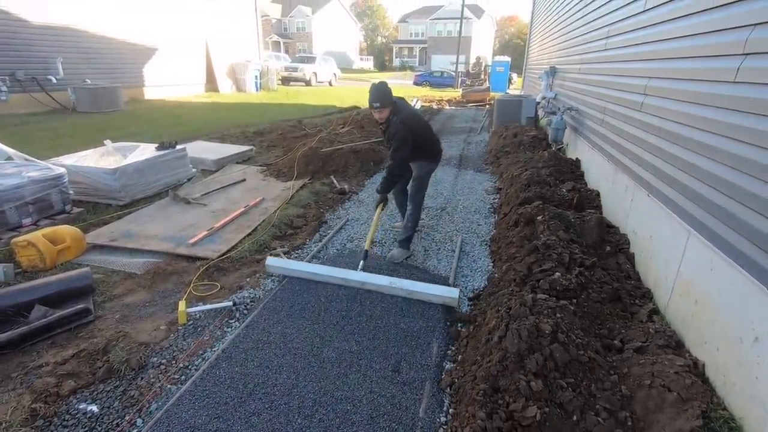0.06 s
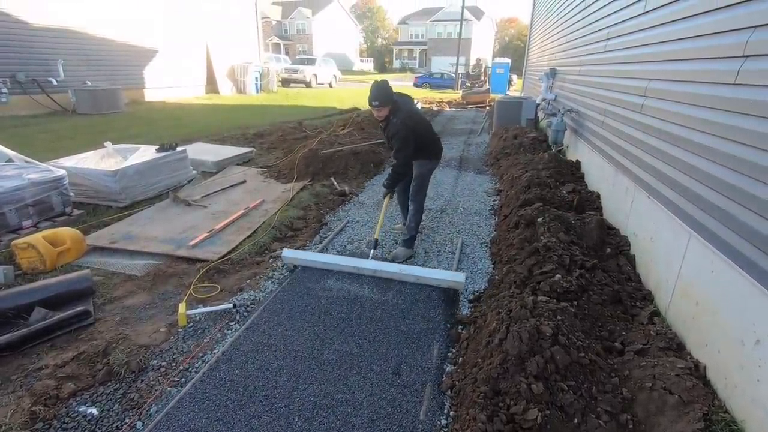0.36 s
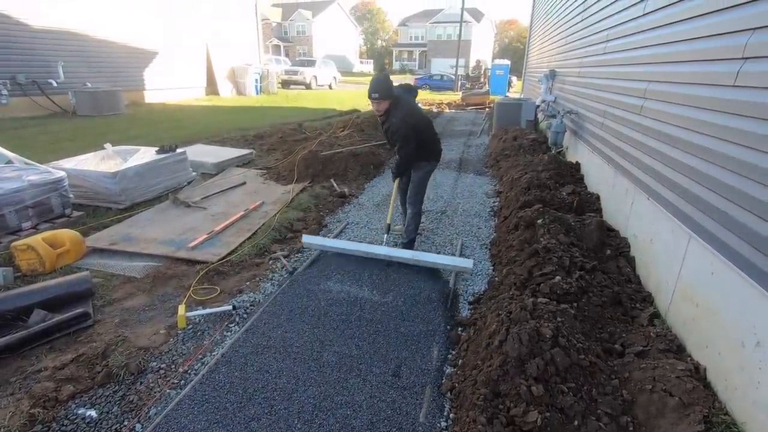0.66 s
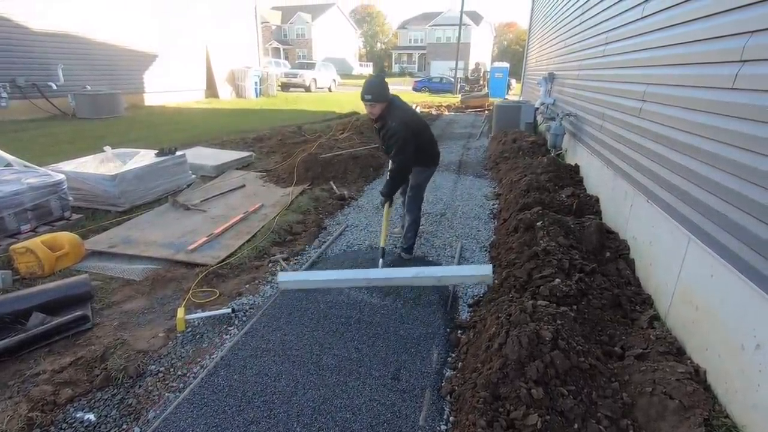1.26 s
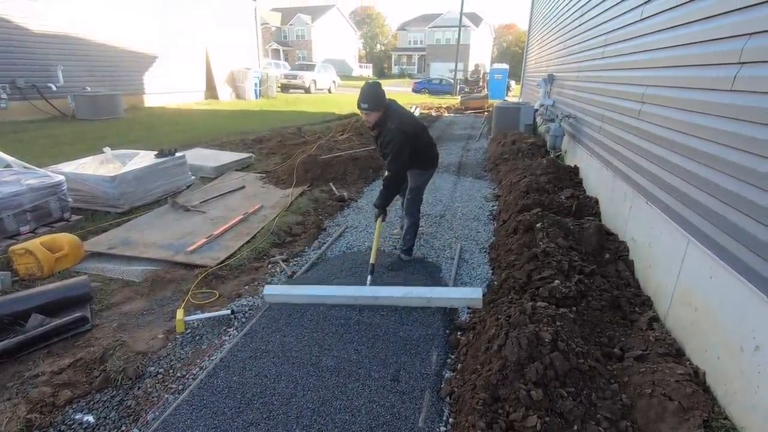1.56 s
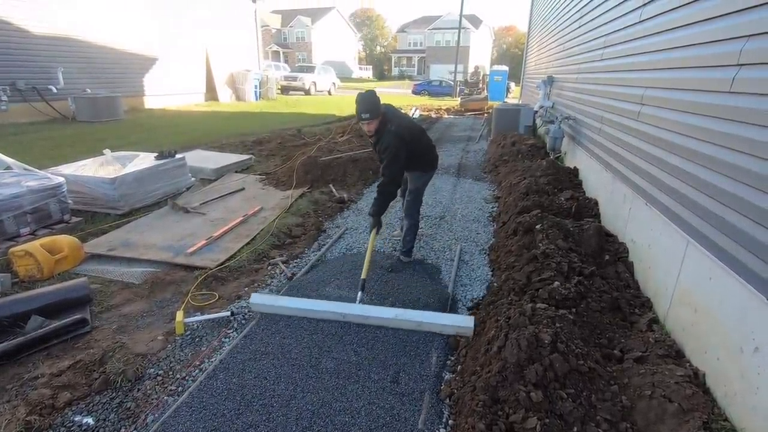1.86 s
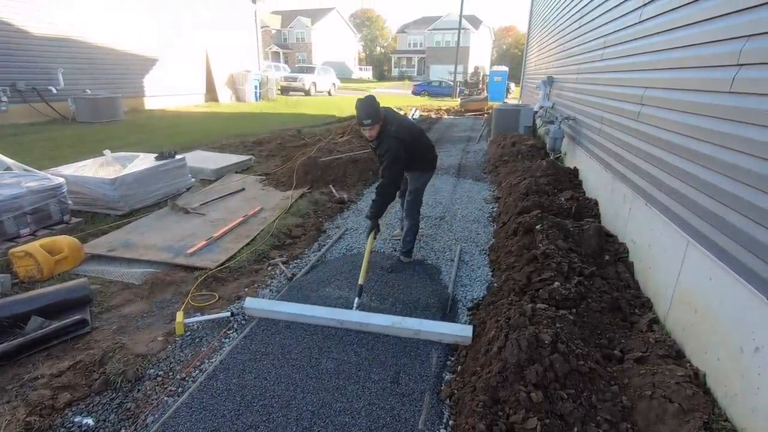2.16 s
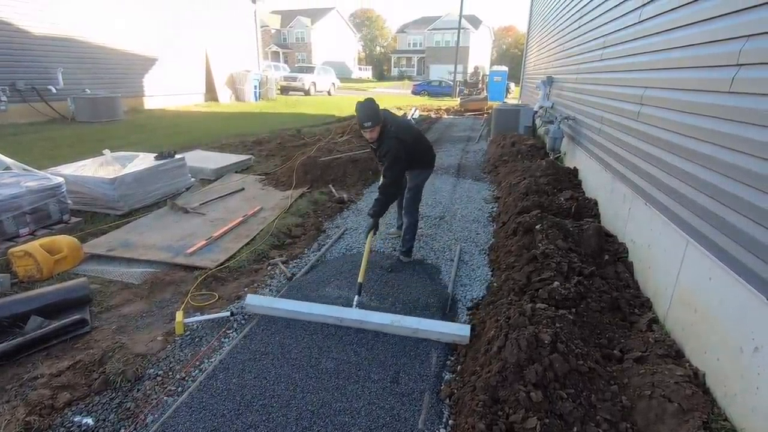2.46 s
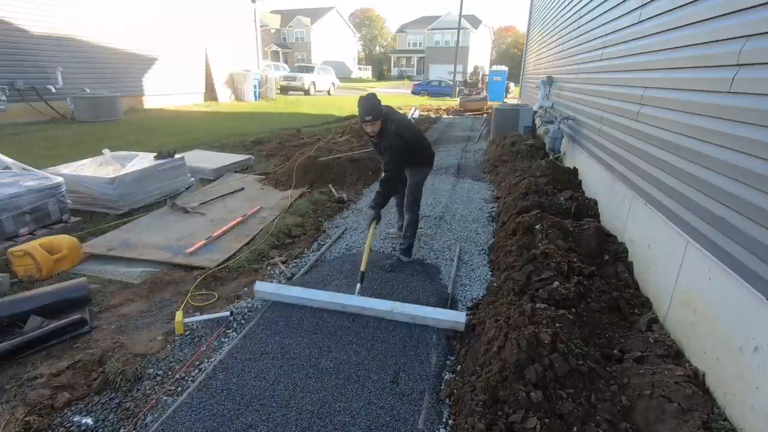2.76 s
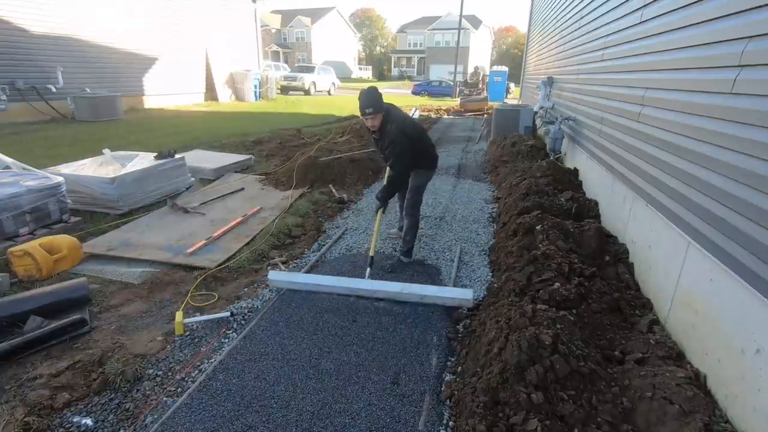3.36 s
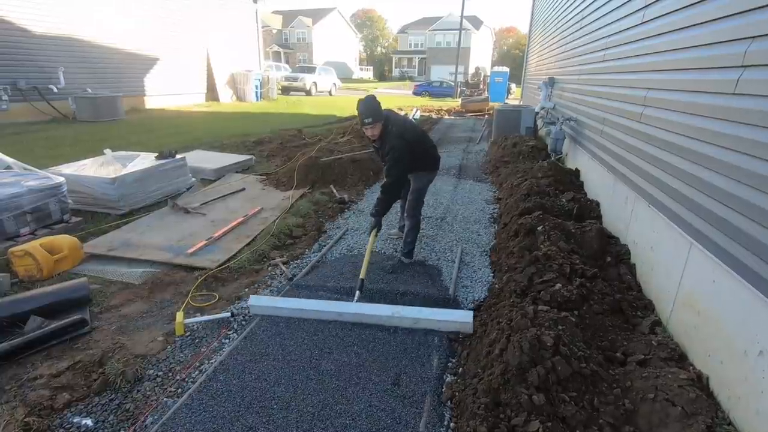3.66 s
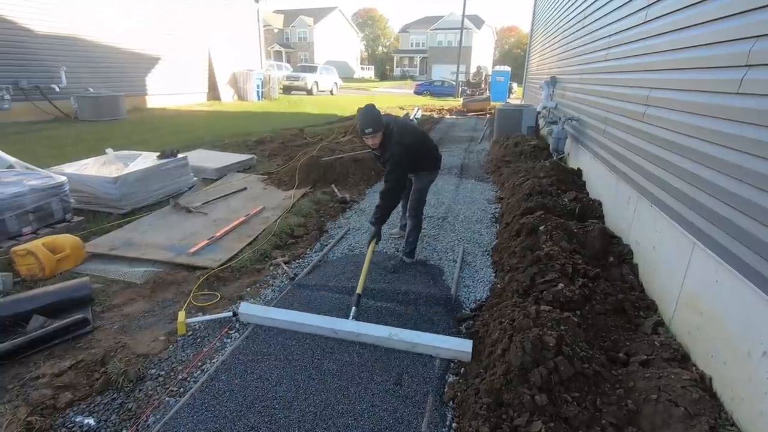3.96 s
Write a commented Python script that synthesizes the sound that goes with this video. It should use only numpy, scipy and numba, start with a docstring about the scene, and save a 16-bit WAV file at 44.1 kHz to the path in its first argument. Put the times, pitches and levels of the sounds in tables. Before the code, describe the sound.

A long metal blade grinds through gravel, spilling fine stones, then pauses and knocks down with a ring. A second rough pull follows, ending in sharp clangs, over a faint outdoor hum and low wind on the microphone.

```python
"""Gravel crunches under a long hollow metal screed: pulled, lifted, set down, nudged and pulled again.
Fine stones spill ahead of the blade; it judders as it catches, and the heap groans in the second pull.
The metal clangs when it is set down and rings lightly when loose stones tick against it.
House walls echo the work; wind buffets the microphone over a faint outdoor hum."""
import sys
import numpy as np
from scipy import signal
from scipy.fft import rfft, irfft
from scipy.io import wavfile
from numba import njit

SR = 44100
rng = np.random.default_rng(int(sys.argv[2]) if len(sys.argv) > 2 else 0)


def dump(signal):
    """Clip the signal to [-1, 1] and save it as 16-bit WAV at the path in sys.argv[1]."""
    limited = np.clip(np.atleast_2d(signal).T, -1, 1)
    pcm = np.round(limited * 32767).astype(np.int16)
    wavfile.write(sys.argv[1], SR, pcm)


N = 176400
COARSE_PER_S, FINES_PER_S = 2200, 7000  # stone contacts
NEAR_WALL_S, NEAR_WALL_DB = .003, -15.5


def undb(db):
    """Decibels to gain."""
    return 10 ** (np.asarray(db) / 20)


def clock(size=N):
    """Time of every sample."""
    return np.arange(size) / SR


def unit(x):
    """Scale to rms 1."""
    return x / np.sqrt(np.mean(x ** 2))


def fader(rows):
    """Gain from (time [s], level [dB]) rows, silent outside them."""
    return undb(np.interp(clock(), *np.array(rows).T, left=-120, right=-120))


def gains(spectrum, hz):
    """Gain of a spectrum at the given frequencies."""
    f, db = np.array(spectrum).T
    return undb(np.interp(np.log(hz + 1e-6), np.log(f), db))


def response(spectrum, size=2048):
    """Minimum-phase impulse response of a spectrum, with unit energy."""
    cepstrum = irfft(np.log(gains(spectrum, np.fft.rfftfreq(size, 1 / SR))))
    cepstrum[1:size // 2] *= 2
    cepstrum[size // 2 + 1:] = 0
    return unit(irfft(np.exp(rfft(cepstrum)))) / np.sqrt(size)


def through(x, impulse):
    """Pass a sound through an impulse response."""
    return signal.oaconvolve(x, impulse)[:N]


def delay(x, s):
    """Start a sound s seconds late."""
    return np.pad(x, (max(int(s * SR), 0), N))[:N]


def noise(spectrum):
    """Steady coloured noise, rms 1."""
    return unit(irfft(rfft(rng.standard_normal(N)) * gains(spectrum, np.fft.rfftfreq(N, 1 / SR)), N))


def stones(per_s, spread_db, size=N):
    """Random stone contacts, many small and a few large; rms 1."""
    when, big, sign = rng.random((3, size))
    strength = undb(spread_db * np.minimum(-np.log(1 - big), 4))
    return unit((when < per_s / SR) * strength * np.sign(sign - .5) + 1e-12)


def burst(shape, per_s):
    """A cluster of stone contacts that carries the energy of its envelope."""
    return unit(shape * stones(per_s, spread_db=3.0, size=len(shape))) * np.sqrt(np.mean(shape ** 2))


def ring(modes, size=SR // 2):
    """Decaying modes of alternating sign from (pitch [Hz], level [dB], t60 [s]) rows."""
    t = clock(size)
    return sum((-1) ** k * undb(db) * np.sin(2 * np.pi * hz * t) * np.exp(-np.log(1000) * t / t60)
               for k, (hz, db, t60) in enumerate(modes))


# dark outdoor bed (frequency [Hz], relative level [dB])
HUM_EQ = [(30, -23), (70, 9), (130, -3), (330, -1.5), (700, -8), (1100, -15.5), (1800, -23), (4000, -29.5),
          (10000, -34)]
def hum(level_db=-51):
    """A faint, steady wash of low outdoor noise."""
    return undb(level_db) * noise(HUM_EQ)


# deep sway and low flutter (frequency [Hz], relative level [dB])
SWAY_EQ = [(1, -28.5), (5, 3.5), (9, -4.5), (16, -18.5), (30, -27), (45, -39.5), (65, -59), (120, -53.5),
           (400, -95)]
BUFFET_EQ = [(10, -45), (25, 4), (45, 15), (70, -33), (120, -22), (400, -53)]
# swell of the gusts (time [s], level [dB])
GUSTS = [(0, -18), (.13, -26.5), (.22, -11.5), (.4, -19.5), (.75, -12), (1.0, -22.5), (1.15, -10.5),
         (1.35, -16), (1.6, -22.5), (2.05, -18.5), (2.18, -9.5), (2.28, -15), (2.65, -19), (3.3, -27.5),
         (3.68, -24), (4, -21.5)]
def wind(buffet_db=-7.5, buffet_power=2.19):
    """Wind sways on the microphone; the strongest gusts break into a flutter."""
    gust = fader(GUSTS)
    return noise(SWAY_EQ) * gust + undb(buffet_db) * noise(BUFFET_EQ) * gust ** buffet_power


def yard_echo(x, level_db=-17.5, t60_s=.18):
    """The houses around throw back a short diffuse tail."""
    wash = noise([(100, 4.5), (2000, 1), (5000, -19.5), (15000, -9)])[:SR]
    tail = wash * np.exp(-np.log(1000) * clock(SR) / t60_s)
    return undb(level_db) * through(delay(x, NEAR_WALL_S), unit(tail) / np.sqrt(SR))


# metallic shimmer (frequency [Hz], relative level [dB])
SHIMMER_EQ = [(2000, -6.5), (3000, -2), (4400, -2.5), (5400, -18.5), (6500, -20.5), (8000, -13),
              (10000, -21), (13000, -30)]
def overtones(count=110, spacing_power=1.6, t60_s=.22):
    """The irregular high modes of the hollow blade, sparser toward the top; one ring per row."""
    place = (np.arange(count) + rng.uniform(0, 1.97, count)) / (count + 1)
    low_hz, high_hz = SHIMMER_EQ[0][0], SHIMMER_EQ[-1][0]
    pitches = low_hz + (high_hz - low_hz) * place ** spacing_power
    levels = 20 * np.log10(gains(SHIMMER_EQ, pitches))
    return np.array([ring([(hz, db, t60_s)]) for hz, db in zip(pitches, levels)])


def at_spot(modes, scatter_db=7):
    """One point of contact gives each ringing mode its own strength and sign."""
    strength, sign = rng.uniform(-1, 1, (2, len(modes)))
    return (np.sign(sign) * undb(scatter_db * strength)) @ modes


def tinkle(per_s=700, low_hz=4500, high_hz=10500, t60_s=.04):
    """Stones click against each other, each with its own brief high pitch; rms 1."""
    out = np.zeros(N + SR)
    for when, pitch, strength in rng.random((int(per_s * N / SR), 3)):
        grain = strength * ring([(low_hz + pitch * (high_hz - low_hz), 0, t60_s)], size=2048)
        start = int(when * N)
        out[start:start + len(grain)] += grain
    return unit(out[:N])


def ping(at_s=.631, hz=9400, level_db=-32, t60_s=.14):
    """One loose stone gives a thin high ping."""
    return delay(ring([(hz, level_db, t60_s)]), at_s)


# light ring of the blade's walls (pitch [Hz], relative level [dB], t60 [s])
WALL_MODES = [(1620, -8, .15), (1880, 2, .1), (2645, 2, .1), (2930, -4, .1), (3250, 2, .13), (3450, -2, .1),
              (3900, 4, .1), (4360, -5, .1)]
# stones skimming the blade (time [s], level [dB])
SKIM = [(0, -32), (.3, -50), (.6, -61), (.89, -43.5), (.94, -54), (1.0, -41), (1.07, -69), (1.73, -83),
        (1.77, -54), (1.97, -66), (2.12, -75), (2.19, -38.5), (2.28, -51), (2.45, -51.5), (2.52, -63),
        (2.59, -47.5), (2.74, -37.5), (3.32, -37.5), (3.44, -50.5), (3.58, -45), (3.73, -48), (4, -52)]
def ticks(shimmer, per_s=660, spot_s=.09, shimmer_db=-3.5, tinkle_db=-21.5):
    """Loose stones tinkle and ring the blade's walls; the colour shifts as the contact wanders."""
    taps, step = stones(per_s, spread_db=2.0), int(spot_s * SR)
    modes = np.array([ring([mode]) for mode in WALL_MODES])
    walls = np.zeros(N + SR)
    for i in range(0, N, step):
        spot = unit(unit(at_spot(modes)) + undb(shimmer_db) * unit(at_spot(shimmer)))
        rung = signal.fftconvolve(taps[i:i + step], spot)
        walls[i:i + len(rung)] += rung
    return (unit(walls[:N]) + undb(tinkle_db) * tinkle()) * fader(SKIM)


@njit
def resonate(x, hz, width_hz):
    """State-variable band-pass whose centre moves every sample."""
    out, band_state, low_state = np.empty(len(x)), 0., 0.
    for i in range(len(x)):
        tuning, damping = np.tan(np.pi * hz[i] / SR), width_hz / hz[i]
        band = (band_state + tuning * (x[i] - low_state)) / (1 + tuning * (tuning + damping))
        band_state = 2 * band - band_state
        low_state += 2 * tuning * band
        out[i] = damping * band
    return out


# groan of the pushed heap (time [s], upper pitch [Hz], lower pitch [Hz], level [dB])
GROAN_GLIDE = [(2.62, 620, 570, -62), (2.67, 670, 570, -36), (2.78, 750, 595, -40.5), (2.92, 734, 613, -28),
               (2.99, 774, 502, -36), (3.13, 883, 520, -37.5), (3.199, 870, 520, -40.5)]
def groan(width_hz=45., lower_db=-2):
    """Under load, stick and slip of the stones drives two gliding resonances."""
    s, upper_hz, lower_hz, db = np.array(GROAN_GLIDE).T
    slips = stones(COARSE_PER_S, spread_db=6.5)
    upper = unit(resonate(slips, np.interp(clock(), s, upper_hz), width_hz))
    lower = unit(resonate(slips, np.interp(clock(), s, lower_hz), width_hz))
    return unit(upper + undb(lower_db) * lower) * fader(list(zip(s, db)))


def focus_db(hz, centre_hz, db_per_octave=4.5):
    """A blow drives the pitches around its centre most strongly."""
    return -db_per_octave * np.abs(np.log2(hz / centre_hz))


# clang of the free blade (pitch [Hz], relative level [dB], t60 [s])
BLADE_MODES = [(318, -28.5, .5), (430, -31, .6), (630, -27, .42), (858, -28, .6), (955, -30, .36),
               (1001, -29, .36), (1152, -29, .32), (1400, -33, .26), (1525, -33, .34), (1597, -23, .25),
               (1656, -25.5, .27), (1787, -33, .45), (1828, -33, .45), (1895, -29, .27), (2634, -23.5, .15),
               (2925, -25, .19), (3254, -26, .25), (3369, -24, .18)]
# stony crack of a landing (frequency [Hz], relative level [dB])
CRACK_EQ = [(150, 11.5), (300, 10), (500, 2), (900, 10.5), (1700, 2), (3100, -10.5), (4300, 1.5),
            (5500, -34.5), (7500, -11.5), (10000, -28), (15000, -30)]
# landings and bumps (time [s], gain [dB], centre [Hz], crack trim [dB], brightness [dB])
KNOCKS = [(1.832, -11.5, 1850, 3, -19), (1.866, -11, 1420, -1.5, -32), (2.007, -24.5, 4120, 1, -13),
          (2.043, -17, 1230, -1, -37), (2.14, -22.5, 4290, 4, -28), (2.18, -30, 3820, 5.5, -22),
          (2.334, -24, 3950, 4.5, -30), (2.373, -26, 1780, 7, -28), (2.515, -31.5, 1060, -8, -35),
          (3.758, -0.5, 2260, 0.5, -34), (3.789, -6.5, 1650, 3, -13), (3.907, -6.5, 1130, 4, -7.5),
          (3.935, -12, 1490, 2.5, -26)]
def knocks(shimmer, crack_db=-23, crack_s=.017, sheen_db=-36, scatter_db=5.5):
    """The blade lands: a crack of stones, its free ring and overtones, each blow at another spot."""
    size = shimmer.shape[1]
    snap = undb(crack_db) * np.exp(-clock(size) / crack_s)
    bins_hz = np.fft.rfftfreq(N, 1 / SR) + 1
    out = 0
    for s, db, centre_hz, trim_db, bright_db in KNOCKS:
        colour = response([(hz, level + focus_db(hz, centre_hz)) for hz, level in CRACK_EQ])
        crack = through(burst(snap, FINES_PER_S), colour)[:size]
        clang = ring([(hz, level + focus_db(hz, centre_hz) + scatter_db * rng.uniform(-1, 1), t60)
                      for hz, level, t60 in BLADE_MODES])
        sheen = irfft(rfft(at_spot(shimmer), N) * undb(focus_db(bins_hz, centre_hz)), N)[:size]
        top = at_spot(shimmer[len(shimmer) // 2:])
        bright = undb(bright_db) * top / np.linalg.norm(top)
        attack = undb(trim_db) * (crack + undb(sheen_db) * sheen)
        out = out + delay(undb(db) * (clang + bright + attack), s)
    return out


# sizzle of fine stones (frequency [Hz], relative level [dB])
FINES_EQ = [(500, -22.5), (2000, 8), (4000, 5.5), (6000, -1), (8000, 0), (10300, -0.5), (12000, -8.5),
            (14000, -21), (16000, -37)]
def fine_stones(contacts):
    """Each contact of a tiny stone is a bright click."""
    return through(contacts, response(FINES_EQ))


# body of a jolt (frequency [Hz], relative level [dB])
JOLT_EQ = [(100, -19), (290, 2.5), (460, -11.5), (660, 9), (840, -8), (1060, 7), (1450, -4), (1700, 2),
           (2400, -2.5), (3700, -0.5), (4600, -15), (6500, -24.5), (15000, -59)]
# the blade catches and jumps (time [s], level [dB], decay [s], relative grit level [dB])
JOLTS = [(0.064, -26.5, 0.016, -24), (0.112, -27, 0.031, -25), (0.143, -25.5, 0.019, -23),
         (0.5596, -28, 0.014, -11), (0.6153, -23.5, 0.01, -23), (0.623, -33, 0.0091, 4),
         (0.645, -20, 0.0093, -2.5), (0.678, -16.5, .016, -23), (0.706, -28.5, 0.028, -32),
         (0.734, -15.5, 0.0018, -39), (.7635, -24.5, 0.0034, -14), (.787, -24.5, 0.0067, -15),
         (0.801, -26.5, 0.0034, -21), (0.8177, -28, 0.0038, -20), (2.709, -34.5, 0.0035, 8),
         (2.853, -24.5, 0.0037, -15), (2.916, -26.5, 0.0096, -29), (2.964, -31, 0.011, -25),
         (3.028, -27.5, 0.012, -28), (3.056, -20.5, 0.0025, -16), (3.094, -23.5, 0.0027, -14),
         (3.105, -21.5, 0.0025, -28), (3.119, -28, 0.016, -35), (3.179, -26.5, 0.011, -25),
         (3.202, -21, 0.014, -15.5), (3.287, -26, 0.0065, -30), (3.337, -29, 0.0036, -25)]
def judder(loaded_t60_share=.44, per_s=2700, ring_db=-8.5):
    """Each catch crushes a short burst of stones and jars the blade, damped by its load."""
    t = clock(SR // 4)
    body, grit = 0, 0
    for s, db, decay_s, grit_db in JOLTS:
        shape = undb(db) * np.exp(-(t / decay_s) ** 2)
        body = body + delay(burst(shape, per_s), s)
        grit = grit + delay(undb(grit_db) * burst(shape, FINES_PER_S), s)
    loaded = ring([(hz, db, t60 * loaded_t60_share) for hz, db, t60 in BLADE_MODES])
    jarred = undb(ring_db) * through(body, loaded / np.linalg.norm(loaded))
    return through(body, response(JOLT_EQ)) + jarred + fine_stones(grit)


# body of the crunch (frequency [Hz], relative level [dB])
CRUNCH_EQ = [(100, -47.5), (200, 0.5), (300, 7), (430, -13), (570, 5.5), (780, 5.5), (1150, 4.5), (1450, 2),
             (2400, -4.5), (3800, 0), (4800, -7.5), (6000, -27.5), (15000, -36)]
# grind under the blade: first pull, then a light push and second pull (time [s], level [dB])
DRAGS = [
    [(0, -30), (.1, -37), (.15, -42), (.21, -37), (.3, -51.5), (.78, -41), (.87, -54), (.93, -56),
     (1.05, -57.5), (1.15, -101)],
    [(1.85, -50.5), (2.05, -51.5), (2.2, -48.5), (2.29, -44.5), (2.36, -57), (2.39, -51), (2.5, -57),
     (2.56, -65), (2.63, -44), (2.7, -30.5), (2.85, -36), (3.0, -40.5), (3.14, -36), (3.22, -38.5),
     (3.34, -33), (3.44, -59), (4, -49.5)],
]
# spill ahead of the blade (time [s], level [dB])
SPILL = [(0, -37), (.17, -30), (.24, -38), (.32, -47), (.43, -45.5), (.53, -44.5), (.66, -37), (.83, -48.5),
         (.95, -49.5), (1.2, -68.5), (1.74, -73), (1.9, -56.5), (2.12, -69), (2.18, -57), (2.33, -67),
         (2.53, -67), (2.58, -51), (2.65, -49), (2.72, -39.5), (2.92, -39), (3.08, -44.5), (3.35, -39.5),
         (3.46, -64), (3.66, -55.5), (4, -55)]
def crunch(surge_db=3):
    """Stones grind under the blade in uneven surges; finer ones spill ahead of it."""
    surge = undb(surge_db * noise([(3, -20), (15, 0), (60, -2), (200, -18), (1000, -90)]))
    coarse = stones(COARSE_PER_S, spread_db=1.0) * surge * sum(fader(drag) for drag in DRAGS)
    spill = stones(FINES_PER_S, spread_db=2.5) * fader(SPILL)
    return through(coarse, response(CRUNCH_EQ)) + fine_stones(spill)


def scene():
    """Gravel mirrored by the near wall and the ringing blade, over yard echo, hum and wind."""
    gravel = crunch() + judder()
    reflection = undb(NEAR_WALL_DB) * delay(gravel, NEAR_WALL_S)
    shimmer = overtones()
    work = gravel + reflection + groan() + ticks(shimmer) + ping() + knocks(shimmer)
    return (work + yard_echo(work) + hum() + wind())[None]


def record(dry):
    """A steep low-pass cuts the very top."""
    top_hz = 15750
    return signal.sosfilt(signal.ellip(10, .2, 80, top_hz, fs=SR, output="sos"), dry)


dry = scene()
out = record(dry)
dump(out)
```